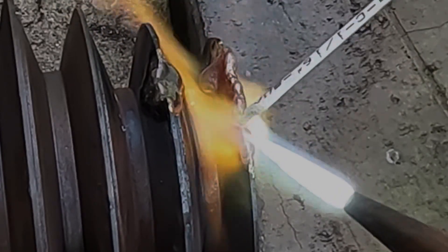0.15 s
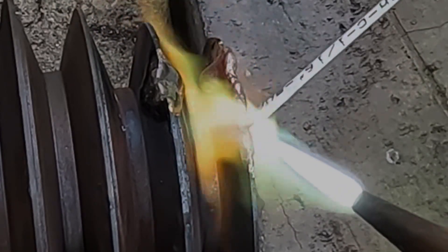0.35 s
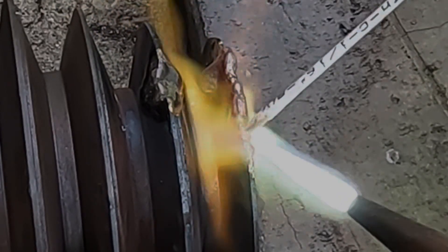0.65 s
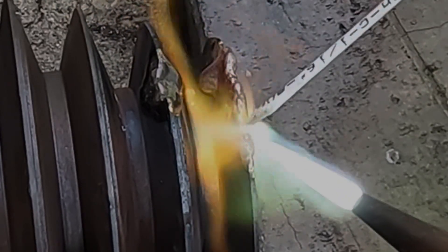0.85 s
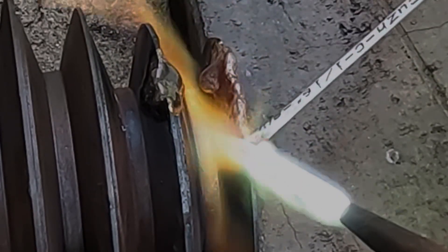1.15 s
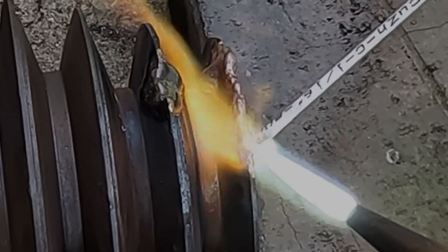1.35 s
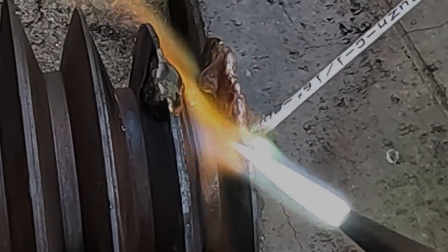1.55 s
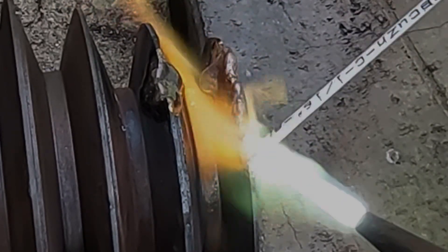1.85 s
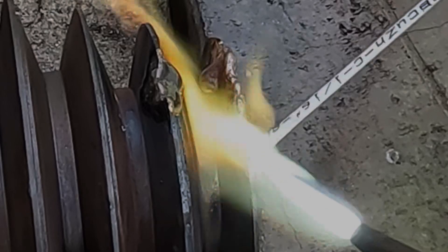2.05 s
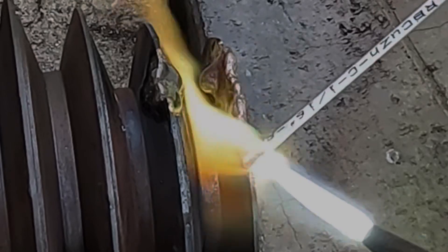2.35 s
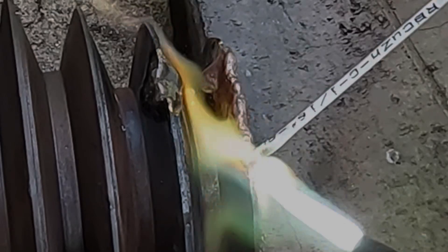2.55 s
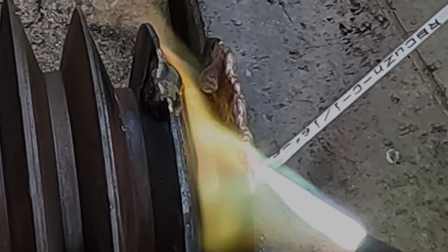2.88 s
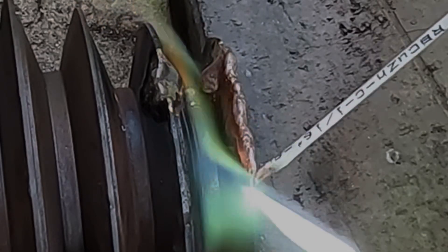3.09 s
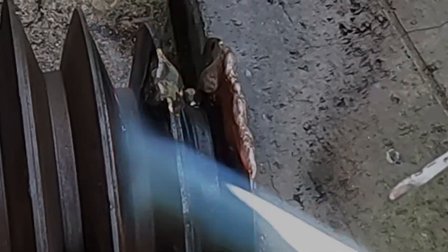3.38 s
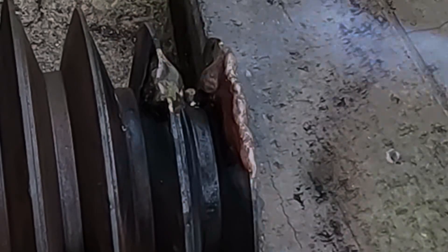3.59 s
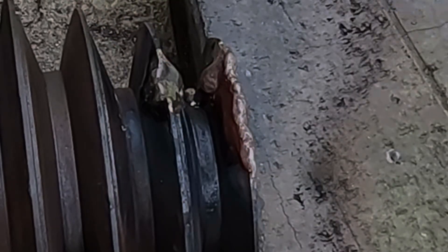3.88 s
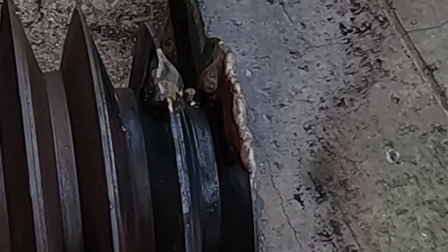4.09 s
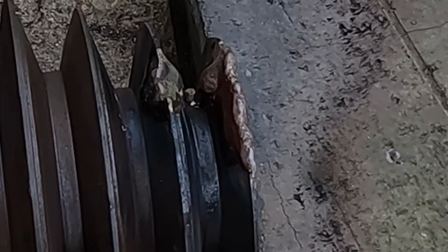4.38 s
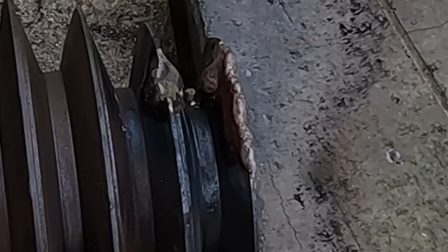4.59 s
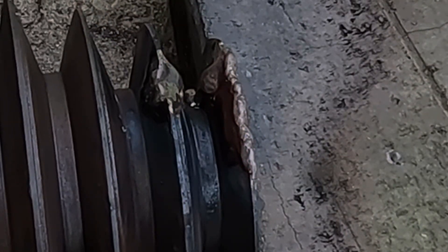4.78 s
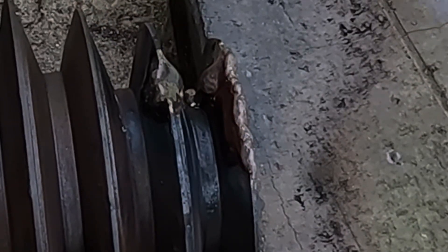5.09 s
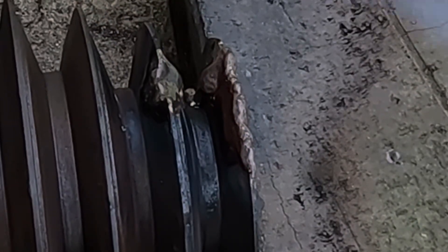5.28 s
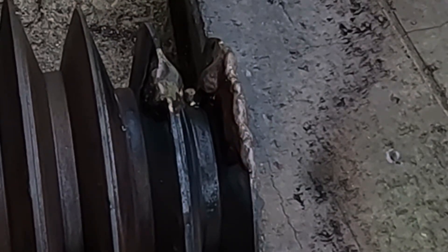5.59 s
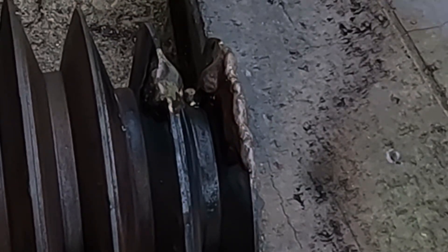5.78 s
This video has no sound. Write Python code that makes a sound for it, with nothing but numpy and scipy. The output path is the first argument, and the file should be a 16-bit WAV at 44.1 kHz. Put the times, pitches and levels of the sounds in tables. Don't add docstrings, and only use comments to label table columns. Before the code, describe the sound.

A gas torch heats grooved metal in a work yard, heard close and dry through a hand-held stereo microphone. From 0 s a low roar and fluttering mid-pitched burble run without pause, under a quieter steady hiss. Short hollow pops, tiny flux spits and a fine simmering crackle scatter over it; soft deep buffets push on the microphone. From about 1.8 to 2.9 s the flame presses into the joint: the burble brightens and surges, sputters and pops crowd together, and heavy thumps peak near 2.2 s and 2.8 s. Around 3.6 s the torch swings off with a puff, a brighter touch of hiss and a faint low knock on the housing. The flame sweeps over the grooves with a low ring until 4.1 s, then burns louder, deeper and fuller, with a strong pop near 4.4 s, sharp dry cracks and renewed low buffeting towards the end at about 5.9 s.

```python
import sys
import numpy as np
from scipy import signal
from scipy.fft import rfft, irfft
from scipy.io import wavfile

SR = 44100
rng = np.random.default_rng(int(sys.argv[2]) if len(sys.argv) > 2 else 0)


def to_wav(s):
    ch = np.atleast_2d(s).T
    pcm = np.round(np.clip(ch, -1, 1) * 32767)
    wavfile.write(sys.argv[1], SR, pcm.astype(np.int16))


def boost_factor(decibels):
    exponent = np.asarray(decibels, float) / 20
    return 10 ** exponent


N = 261954


def rms_one(x):
    return x / np.sqrt(np.mean(x ** 2) + 1e-20)


def in_time(rows):
    s, *columns = np.transpose(rows)
    return [np.interp(np.arange(N) / SR, s, c) for c in columns]


def at_hz(points, hz, column=1):
    table = np.array(points)
    return np.interp(np.log(hz), np.log(table[:, 0]), table[:, column])


def ramp(s, takes_s):
    return 0.5 + 0.5 * np.tanh((np.arange(N) / SR - s) * 2 / takes_s)


def drift(rate_hz):
    r = np.exp(-40 * np.pi * rate_hz / SR)
    chance = rng.standard_normal(N // 20 + 2002)
    slow = signal.lfilter([1], [1, -2 * r, r * r], chance)[2000:]
    return np.interp(np.arange(N) / 20, np.arange(len(slow)), rms_one(slow))


def band(x, low_hz, high_hz):
    return signal.sosfilt(signal.butter(2, [low_hz, high_hz], "band", fs=SR, output="sos"), x)


def coloured(points, count, grain=1):
    hz = np.maximum(np.arange(N // 2 + 1) * SR / N, 1)
    spectrum = rfft(grain * rng.standard_normal((count, N)))
    return irfft(spectrum * boost_factor(at_hz(points, hz)), N)


def sides(pan_db):
    return boost_factor([pan_db / 2, -pan_db / 2])


def at_ports(mid, side, alike):
    return np.sqrt(1 + alike) * mid + np.sqrt(1 - alike) * side * [[1], [-1]]


def add(out, s, sound, peak_db, pan_db):
    i = max(round(s * SR), 0)
    part = (boost_factor(peak_db) * sound / np.abs(sound).max())[:N - i]
    out[:, i:i + len(part)] += sides(pan_db)[:, None] * part


def burst(noise, rise_s, fall_s):
    t = np.arange(len(noise)) / SR
    return noise * (1 - np.exp(-t / rise_s)) * np.exp(-t / fall_s)


def stance():
    free = ramp(3.576, takes_s=0.14)
    bite = ramp(1.816, takes_s=0.082) - ramp(2.9, takes_s=0.082)
    return free, bite


# (time [s], level [dB])
VIGOUR = [(0.0, -44), (0.38, -44), (1.02, -45.5), (1.21, -44.5), (1.55, -46), (2.22, -43), (2.35, -40),
          (2.71, -43), (4.32, -36.5), (4.53, -37.5), (5.31, -37), (5.51, -33.5), (5.62, -36.5),
          (5.94, -38.5)]
# (time [s], change [dB], half length [s])
SURGES = [(0.348, 3, 0.086), (0.873, 3, 0.078), (0.986, 7.5, 0.017), (1.763, 4.5, 0.039),
          (2.235, 8.5, 0.043), (2.298, 1, 0.023), (2.432, 4.5, 0.01), (4.432, -2, 0.0077),
          (3.891, -8.5, 0.014), (3.655, -1.5, 0.022), (0.778, 3, 0.021), (2.365, 3, 0.088),
          (2.882, 3.5, 0.071), (2.995, 8, 0.018), (3.19, 3, 0.064), (3.581, 8, 0.031), (4.038, 2, 0.26),
          (4.183, -5, 0.099), (4.288, 3, 0.015), (4.351, 5, 0.01), (4.405, 7.5, 0.009), (4.58, 6, 0.036),
          (4.698, 5.5, 0.062), (4.8, -4, 0.044), (5.05, 1.5, 0.11), (5.192, -5.5, 0.057), (5.235, 7, 0.01),
          (5.371, -6.5, 0.047), (5.46, -3.5, 0.1), (5.843, 1.5, 0.062)]
# (time [s], level [dB])
TIP_NEARNESS = [(0, -59.5), (0.64, -59), (1.5, -57), (1.7, -56.5), (2.05, -56.5), (3.09, -58), (3.42, -57),
                (3.6, -52.5), (3.68, -56.5), (4.4, -56), (5.15, -56.5), (5.25, -54.5), (5.4, -56),
                (5.62, -56), (5.94, -56)]


def burning():
    t = np.arange(N) / SR
    surge = sum(db * np.exp(-((t - s) / max(half_s, 0.01)) ** 2) for s, db, half_s in SURGES)
    vigour = in_time(VIGOUR)[0] + surge
    free, bite = stance()
    roar = -35.5 + 0.54 * (vigour - vigour.mean()) + 4 * free
    burble = vigour - 1.5
    upper = vigour + 0.072 * surge - 8.5 + 3.5 * bite - free
    hiss = in_time(TIP_NEARNESS)[0] + 1 + 0.046 * surge
    return roar, burble, upper, hiss


def ignitions(per_s=200.0, strength_db=10.0, uneven_db=4.5, fall_s=0.00054):
    free, _ = stance()
    uneven = uneven_db * np.minimum(rng.exponential(1, N), 2)
    sizes = boost_factor(strength_db - 4.5 * free + uneven)
    r = np.exp(-1 / (fall_s * SR))
    return 1 + signal.lfilter([1], [1, -r], sizes * (rng.random(N) < per_s / SR)) / 5


FLAME_ZONES_HZ = (430, 1150, 1800)
# (frequency [Hz], density [dB per Hz])
ROAR_COLOUR = [(59, -48), (100, -2), (151, 3), (221, -1.5), (297, 1), (426, -12), (520, -3.5), (680, -60),
               (1140, -120)]
# (frequency [Hz], density [dB per Hz])
BURBLE_COLOUR = [(240, -65), (400, 15), (427, 9), (468, -1.5), (528, -6), (668, 0.5), (852, -3.5),
                 (941, -5), (1530, -14.5), (1730, -16.5), (2200, -9.5), (2860, -30), (4840, -120)]
# (frequency [Hz], density [dB per Hz])
HISS_COLOUR = [(1060, -14), (1800, -2.5), (2070, -4), (2800, -5), (3500, -3), (5040, -7), (7180, -12),
               (8460, -19.5), (9630, -18.5), (10800, -26), (11900, -24.5), (13100, -32), (14200, -34)]
# (frequency [Hz], flutter shared by all bands [dB], flutter of its own [dB])
FLUTTER = [(150, 0.5, 2), (616, 1.5, 2.5), (1490, 4.5, 1.05), (3080, 0, 1.54), (9000, 0.9, 0.1)]
# (frequency [Hz], likeness [0-1])
LIKENESS = [(100, 0.99), (300, 1), (1400, 0.99), (2300, 0.56), (5000, 0.68), (9000, 0.74), (13000, 0.33)]
# (frequency [Hz], left minus right [dB])
LEAN = [(60, 0), (150, 0), (370, -1.5), (910, -3), (2250, -1), (5560, 1), (13800, 1.5)]


def flame(levels_db):
    zones = np.zeros((4, 2, N))
    burble = coloured(BURBLE_COLOUR, count=4, grain=ignitions())
    noises = [coloured(ROAR_COLOUR, count=4), burble, burble, coloured(HISS_COLOUR, count=4)]
    swing = rms_one(0.19 * drift(31.0) + drift(91.0))
    together = np.tanh(swing / 1.78) * 2.38
    edges = 90 * 2 ** np.arange(0, 7.5, 1 / 3)
    for k, (low, high) in enumerate(zip(edges, edges[1:])):
        hz = np.sqrt(low * high)
        zone = np.searchsorted(FLAME_ZONES_HZ, hz)
        mid, side = band(noises[zone][k % 2::2], low, high)
        pair = at_ports(mid, side, at_hz(LIKENESS, hz))
        flutter_db = at_hz(FLUTTER, hz) * together + at_hz(FLUTTER, hz, column=2) * drift(23.2)
        zones[zone] += boost_factor(flutter_db) * sides(at_hz(LEAN, hz))[:, None] * pair
    return [boost_factor(db) * rms_one(z) for db, z in zip(levels_db, zones)]


def edged(x):
    on_work = signal.sosfiltfilt(signal.butter(6, 1770, fs=SR, output="sos"), x)
    off_work = signal.sosfiltfilt(signal.butter(6, 1500, fs=SR, output="sos"), x)
    free, _ = stance()
    kept = on_work + (off_work - on_work) * free
    return kept + boost_factor(-6.5) * (x - kept)


def wavering(hiss, sway_db=1.1):
    top = signal.sosfiltfilt(signal.butter(2, 7500, "high", fs=SR, output="sos"), hiss)
    return hiss + (boost_factor(sway_db * drift(5.6)) - 1) * top


def crackle(level_db, low_hz, high_hz, per_s, cycles, uneven_db):
    uneven = uneven_db * np.minimum(rng.exponential(1, N), 3)
    sizes = boost_factor(uneven) * rng.choice([-1, 1], N)
    born = rng.random(N) < per_s * boost_factor(4.0 * drift(8.0)) / SR
    dealt = rng.integers(0, 12, N)
    out = np.zeros(N)
    for k, hz in enumerate(np.geomspace(low_hz, high_hz, 12)):
        r = boost_factor(-60 * hz / (cycles * SR))
        w = 2 * np.pi * hz / SR
        grains = sizes * born * (dealt == k) + 1e-18
        out += signal.lfilter([0, np.sin(w)], [1, -2 * r * np.cos(w), r * r], grains)
    return boost_factor(level_db) * rms_one(band(out, low_hz / 1.5, high_hz * 1.14)) * sides(-1.0)[:, None]


def grooves(roar_db, upper_db):
    free, bite = stance()
    noise = rng.standard_normal((4, N))
    high = band(band(noise[0] * ignitions(), 1330, 1610), 1300, 1640)
    high = rms_one(high * boost_factor(3.5 * drift(40.0)))
    low = rms_one(band(noise[1], 283, 340) * boost_factor(1.3 * drift(14.0)))
    middle = rms_one(band(band(noise[2], 874, 1003), 890, 1000) * boost_factor(3.1 * drift(17.0)))
    rim = rms_one(band(band(noise[3], 1010, 1410), 1070, 1460) * boost_factor(4.0 * drift(30.0)))
    sweep = free - ramp(4.13, takes_s=0.17)
    rings = boost_factor(upper_db - 4.5) * bite * high
    rings += boost_factor(upper_db - 3.5) * (1 - free) * middle
    rings += boost_factor(upper_db - 6.5) * free * rim
    swept = sweep * boost_factor(roar_db - 5.5) * low
    return sides(-0.86)[:, None] * rings + sides(-1.2)[:, None] * swept


# (time [s], level [dB])
GUST = [(0.0, -32.5), (0.15, -36), (0.41, -39), (0.55, -37), (0.84, -34.5), (1.03, -41.5), (1.22, -35),
        (1.35, -39), (1.62, -44), (1.72, -50), (1.9, -47), (2.25, -35), (2.33, -46), (2.45, -37),
        (2.7, -32), (3.09, -40), (3.55, -33), (3.8, -36), (4.0, -44), (4.15, -49), (4.3, -42), (4.5, -38),
        (5.49, -34), (5.94, -29.5)]
# (frequency [Hz], density [dB per Hz])
GUST_COLOUR = [(8.8, -25), (15, 4.5), (54, 2), (102, -1.5), (160, -12.5), (210, -1), (350, -120)]


def gusts(alike=0.95, lumpy_db=2.5):
    level_db = in_time(GUST)[0] + 2
    free, _ = stance()
    pan_db = -3 + 2.5 * free
    mid, side = coloured(GUST_COLOUR, count=2)
    lumps = boost_factor(lumpy_db * np.tanh(drift(13.4)))
    pressure = rms_one(at_ports(mid, side, alike) * lumps)
    return boost_factor(level_db) * sides(pan_db) * 1.5 * np.tanh(pressure / 1.5)


# (time [s], peak level [dB], pitch [Hz])
POPS = [(0.112, -35.5, 969), (0.218, -29, 695), (0.267, -31, 619), (0.39, -24.5, 1000), (0.476, -31, 665),
        (0.49, -23, 820), (0.684, -25.5, 840), (0.975, -21.5, 680), (1.061, -26, 710), (1.11, -29.5, 695),
        (1.349, -30, 654), (1.381, -26.5, 730), (1.595, -31, 748), (1.685, -25, 900), (1.71, -29, 888),
        (1.91, -23.5, 1030), (1.986, -28, 660), (2.169, -22.5, 920), (2.209, -25, 950), (2.38, -34, 861),
        (2.399, -19, 880), (2.461, -26, 810), (2.479, -23, 760), (2.565, -24, 673), (2.623, -20.5, 680),
        (2.647, -19.5, 755), (2.681, -24, 568), (2.757, -29, 1430), (2.796, -25, 934), (2.818, -24, 720),
        (2.868, -23, 870), (2.94, -23.5, 644), (2.962, -26, 724), (3.038, -25, 656), (3.119, -31, 899),
        (3.233, -23, 750), (3.478, -22.5, 735), (3.568, -22.5, 640), (3.708, -44, 630), (3.788, -26, 759),
        (3.897, -31, 680), (4.035, -39, 891), (4.34, -24, 1000), (4.401, -28, 692), (4.412, -23, 775),
        (4.431, -15, 1050), (4.453, -25, 970), (4.476, -35, 586), (4.572, -28, 800), (4.641, -21.5, 592),
        (4.667, -23, 695), (4.921, -26, 686), (4.947, -25, 649), (5.018, -23, 700), (5.215, -25, 560),
        (5.431, -26, 696), (5.46, -19, 720), (5.577, -28, 600), (5.744, -21.5, 566), (5.901, -33, 646)]
# (frequency [Hz], level [dB])
HOLLOWS = [(690, -12), (950, -11), (1500, -19.5)]


def pops(rough=0.29, uneven_db=5.5):
    out, t = np.zeros((2, N)), np.arange(900) / SR
    for s, db, hz in POPS:
        roughness = rms_one(band(rng.standard_normal(900), 970, 1710))
        tone = np.sin(2 * np.pi * hz * t) + rough * roughness
        for hollow_hz, hollow_db in HOLLOWS:
            gain = boost_factor(hollow_db + uneven_db * rng.standard_normal())
            tone = tone + gain * np.sin(2 * np.pi * hollow_hz * t)
        add(out, s, burst(tone, rise_s=0.00081, fall_s=0.0027), db - 4.0, pan_db=-2.5)
    return out


# (time [s], peak level [dB], centre [Hz])
SPITS = [(0.265, -42, 2010), (0.315, -49, 2320), (0.393, -45, 2400), (0.49, -44, 2370), (0.522, -46, 2200),
         (0.6589, -46, 2590), (0.973, -39, 2440), (1.059, -38, 2480), (1.1096, -42, 3550),
         (1.18, -32, 3570), (1.3485, -38, 2160), (1.4158, -36, 3880), (1.5913, -31.5, 3480),
         (1.708, -39, 3970), (1.751, -38.5, 2160), (1.7684, -40, 2540), (1.947, -37, 1960),
         (2.136, -35, 3200), (2.21, -39, 2430), (2.3315, -36, 1920), (2.434, -44, 2390),
         (2.4771, -30.5, 1980), (2.5576, -41, 2200), (2.5667, -36, 2520), (2.6244, -53, 1910),
         (2.645, -50, 2030), (2.6804, -40, 2400), (2.7551, -37, 2500), (2.8675, -42, 2400),
         (3.1186, -51, 2520), (3.175, -38.5, 3130), (3.2895, -33.5, 3080), (3.3079, -45, 1910),
         (3.3726, -40, 2900), (1.004, -43, 2300), (1.124, -38, 3400), (1.381, -46, 2230),
         (1.686, -54, 2300), (2.939, -51, 2500), (2.992, -39.5, 3800), (3.227, -46, 2900),
         (3.322, -43, 3180), (3.425, -41, 2640), (1.908, -47, 2800), (2.028, -41, 2600)]


def spits():
    out = np.zeros((2, N))
    for s, db, hz in SPITS:
        puff = burst(rng.standard_normal(700), rise_s=0.00038, fall_s=0.0016)
        ring = band(band(puff, hz / 1.06, hz * 1.12), hz / 1.8, hz * 1.05)
        body = band(band(puff, 990, 4240), 760, 5400)
        add(out, s, ring, db - 10.5, pan_db=-9.0)
        add(out, s, body, db + 0.5, pan_db=-2.0)
    return out


# (time [s], peak level [dB])
SPUTTERS = [(0.267, -37), (0.314, -33), (0.986, -39), (1.004, -36), (1.182, -38), (1.414, -36),
            (1.594, -38), (1.686, -26.5), (1.708, -27), (1.91, -35), (2.189, -41), (2.21, -34),
            (2.246, -28), (2.258, -33), (2.289, -31), (2.332, -30), (2.348, -36.5), (2.397, -35),
            (2.41, -34), (2.428, -27), (2.436, -31), (2.463, -36), (2.478, -27), (2.527, -36), (2.565, -31),
            (2.579, -39), (2.615, -34), (2.623, -25.5), (2.647, -29), (2.681, -31), (2.703, -39),
            (2.755, -37), (2.795, -38), (2.817, -33), (2.857, -35), (2.868, -35), (2.939, -38),
            (3.119, -37), (3.228, -44), (3.373, -33), (3.395, -32), (4.3, -36), (4.33, -39), (4.364, -34),
            (4.413, -35), (4.432, -35), (4.562, -32), (4.59, -34), (4.672, -38), (5.023, -37), (5.035, -35),
            (5.268, -40), (5.497, -36), (5.722, -37), (5.812, -35)]


def sputters():
    out = np.zeros((2, N))
    for s, db in SPUTTERS:
        puff = burst(rng.standard_normal(800), rise_s=0.0004, fall_s=0.002)
        hollow = band(band(puff, 1280, 1640), 1060, 1900)
        edge = band(band(puff, 1850, 2500), 1900, 3400)
        add(out, s, hollow, db - 2.0, pan_db=-2.0)
        add(out, s, edge, db - 13.0, pan_db=-2.5)
    return out


# (time [s], peak level [dB], frequency [Hz], left minus right [dB])
THUMPS = [(0.307, -26, 59, -8), (0.379, -25, 37, -6), (0.426, -24, 29.7, -5), (0.71, -23, 32, 3),
          (0.825, -18, 50, -7), (0.332, -28, 72, -5), (1.5, -29, 60, -3), (1.541, -31, 55, -8),
          (1.8, -30, 40, -5), (0.865, -23, 45, -6), (1.143, -23, 164, -2), (1.235, -23.5, 170, -1),
          (2.24, -13, 59, -6.5), (2.483, -17.5, 45.6, -6), (2.3, -20, 70, -6), (2.621, -17.5, 130, -10),
          (3.1, -28, 35, -9), (2.767, -16, 53, -8), (2.881, -25, 49, -9), (2.979, -16.5, 50, -5),
          (2.997, -20.5, 120, -11), (2.064, -27, 46, -5), (2.165, -25, 43, -4), (4.1, -24, 40, -8),
          (3.952, -18, 144, -2), (3.235, -23.5, 55, -4), (3.745, -25, 32, -4), (4.168, -30, 35, -3),
          (4.455, -28, 40, -2), (3.525, -24, 65, 0), (1.12, -29, 39, -4), (5.3, -29, 110, -4),
          (4.851, -29, 183, 3), (5.234, -19, 89, -4), (5.415, -31, 110, 0), (5.472, -16, 101, 1),
          (4.826, -19.5, 70, -2), (3.124, -26, 107, -1), (5.041, -23, 101, 0), (5.478, -23, 35, 3),
          (5.554, -16, 150, -2), (5.791, -18, 120, 0)]
# (time [s], peak level [dB], frequency [Hz], left minus right [dB])
PULLS = [(0.322, -29, 60, -2), (0.352, -30, 55, -2), (0.4, -23, 35, -9), (0.617, -20, 100, -2.5),
         (0.8, -25, 50, -3), (0.899, -20, 75, -3), (1.178, -28, 70, -2), (1.219, -27, 60, -4),
         (1.548, -24, 39.3, -7), (1.594, -32, 70, -2), (2.18, -31, 60.4, -6), (2.481, -21.5, 130, -3),
         (2.563, -20.5, 70, -5), (2.613, -20.5, 80, -7), (2.725, -22, 40, -8), (2.778, -18, 60, -7),
         (2.895, -23.5, 50, -9), (3.003, -23, 45.3, -6), (3.372, -22.5, 44.8, -7), (3.483, -22, 150, 0),
         (3.619, -14.5, 168, -1), (4.338, -20, 200, 0), (4.837, -21, 50, -5), (5.852, -14, 110, -1),
         (5.595, -22, 130, 0), (5.8, -17.5, 150, 0), (5.481, -18, 50, -1)]


def thumps(cycles=1.9):
    out = np.zeros((2, N))
    for rows, sign in ((THUMPS, 1), (PULLS, -1)):
        for s, db, hz, pan_db in rows:
            phase = np.arange(round(cycles * SR / hz)) * hz / SR
            bell = np.sin(np.pi * phase / cycles) ** 2
            swing = bell * np.cos(2 * np.pi * (phase - cycles / 2))
            add(out, s - 0.37 / hz, sign * swing, db - 1.5, pan_db)
    return out


# (time [s], peak level [dB], top [Hz])
SPARKS = [
    (1.089, -54, 11000),
    (1.185, -60, 11000),
    (1.592, -49, 12000),
    (2.72, -52, 11000),
    (3.528, -54, 12000),
    (3.908, -59, 12000),
    (4.4128, -52, 12500),
    (5.223, -63, 11000),
    (5.4969, -62, 14500),
    (5.722, -49, 12000),
]


def sparks():
    out = np.zeros((2, N))
    for s, db, top_hz in SPARKS:
        puff = burst(rng.standard_normal(400), rise_s=0.0002, fall_s=0.00087)
        add(out, s, band(band(puff, 7000, top_hz), 7000, top_hz), db, pan_db=6.0)
    return out


# (time [s], peak level [dB])
SNAPS = [(1.18, -77), (1.592, -37), (1.6821, -43), (1.707, -42), (2.4758, -59), (3.1774, -74),
         (3.2894, -60), (3.4715, -74), (3.527, -45.5), (3.908, -40.5), (3.9913, -43), (4.3964, -46),
         (4.4128, -40), (4.8396, -43), (5.022, -48), (5.224, -38), (5.2694, -51), (5.2909, -50),
         (5.319, -44), (5.4969, -47), (5.5255, -50), (5.6057, -41), (5.722, -37)]


def snaps():
    out = np.zeros((2, N))
    for s, db in SNAPS:
        puff = burst(rng.standard_normal(500), rise_s=0.00034, fall_s=0.00088)
        add(out, s, band(band(puff, 2450, 6300), 2500, 9000), db + 2.0, pan_db=-1.0)
    return out


# (time [s], peak level [dB], centre [Hz])
CRACKS = [(3.488, -36, 2650), (3.527, -39, 2970), (3.5484, -40, 4130), (3.6012, -33.5, 2700),
          (3.9315, -31, 2820), (3.9914, -36, 2820), (4.035, -40, 3390), (4.3046, -35.5, 4170),
          (4.33, -35.5, 4030), (4.3959, -41, 3040), (4.4124, -44, 2750), (4.5616, -37.5, 3400),
          (4.59, -41, 2900), (4.6733, -40, 3210), (4.856, -35, 3440), (4.9457, -33, 3140),
          (5.022, -29.5, 4500), (5.0983, -38, 2700), (5.216, -33.5, 3480), (5.2679, -30.5, 3360),
          (5.29, -38, 3370), (5.3189, -32.5, 3500), (5.456, -39, 3170), (5.497, -33.5, 2960),
          (5.524, -35, 3230), (5.5922, -42, 3720), (5.606, -33, 2970), (5.6657, -36.5, 2940),
          (5.7217, -36.5, 3520), (5.812, -40, 2890), (5.033, -41, 2600), (5.225, -37, 4500),
          (5.535, -36, 3280), (5.673, -40, 3300), (3.61, -42, 3480), (3.86, -40.5, 2700),
          (4.209, -40, 2220), (4.07, -45, 3600)]


def cracks():
    out = np.zeros((2, N))
    for s, db, hz in CRACKS:
        puff = burst(rng.standard_normal(700), rise_s=0.00016, fall_s=0.0012)
        ring = band(band(puff, hz / 1.07, hz * 1.04), hz / 2.7, hz * 1.3)
        body = band(band(puff, 1140, 4330), 1100, 5700)
        add(out, s, ring, db - 14.0, pan_db=-6.0)
        add(out, s, body, db - 0.5, pan_db=-5.5)
    return out


# (time [s], peak level [dB], pitch [Hz])
KNOCKS = [
    (3.6, -30, 150),
    (3.954, -36, 150),
    (4.492, -37, 150),
]


def knocks():
    out, t = np.zeros((2, N)), np.arange(4000) / SR
    for s, db, hz in KNOCKS:
        ring = burst(np.sin(2 * np.pi * hz * t), rise_s=0.0028, fall_s=0.031)
        add(out, s, ring, db, pan_db=20.5)
    return out * [[1], [-1]]


def scene():
    levels_db = burning()
    roar_db, _, upper_db, hiss_db = levels_db
    roar, burble, upper, hiss = flame(levels_db)
    simmer = crackle(upper_db - 7.0, low_hz=843, high_hz=1714, per_s=260.0, cycles=41.0, uneven_db=4.5)
    fizz = crackle(hiss_db - 10.5, low_hz=1780, high_hz=5000, per_s=75.0, cycles=6.0, uneven_db=1.0)
    fire = roar + edged(burble + upper + simmer) + wavering(hiss) + fizz + grooves(roar_db, upper_db)
    melt = pops() + spits() + sputters() + sparks() + snaps() + cracks()
    microphone = gusts() + thumps() + knocks()
    return fire + melt + microphone


def top_cut(x):
    return signal.sosfilt(signal.butter(12, 14360, fs=SR, output="sos"), x)


def record(dry):
    cut = signal.sosfilt(signal.cheby2(10, 60, 16500, fs=SR, output="sos"), dry)
    mix = cut * np.minimum((N - np.arange(N)) / 150, 1)
    return top_cut(mix)


dry = scene()
out = record(dry)
to_wav(out)
```